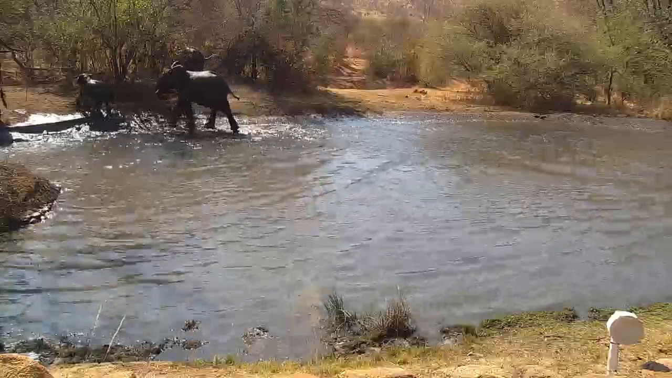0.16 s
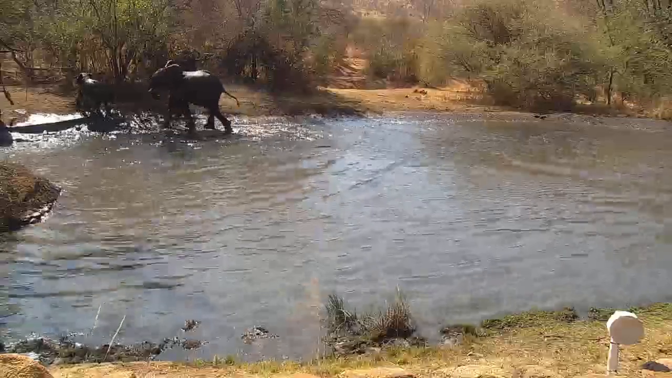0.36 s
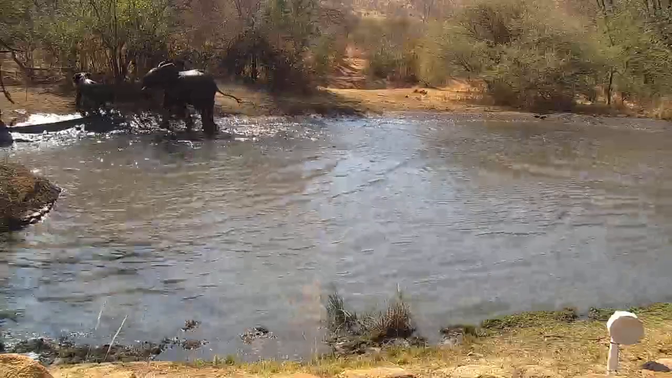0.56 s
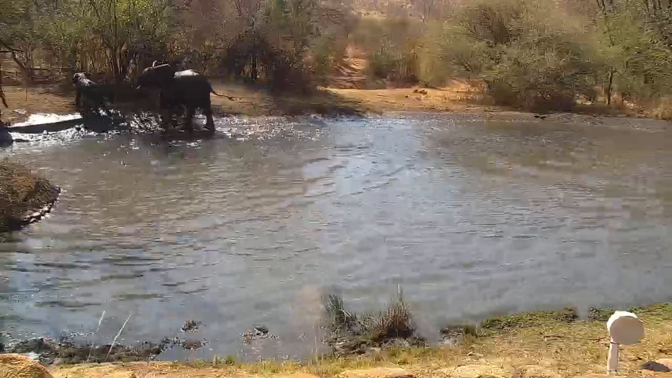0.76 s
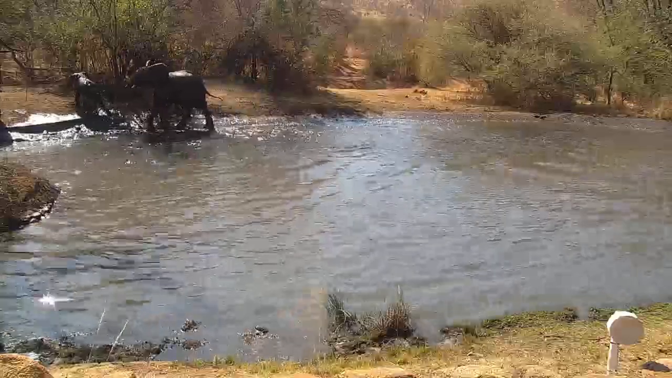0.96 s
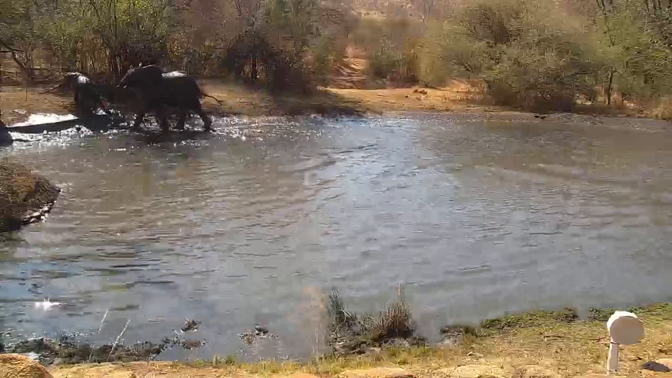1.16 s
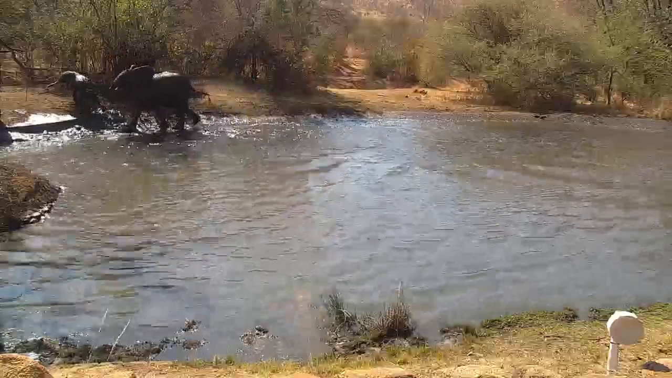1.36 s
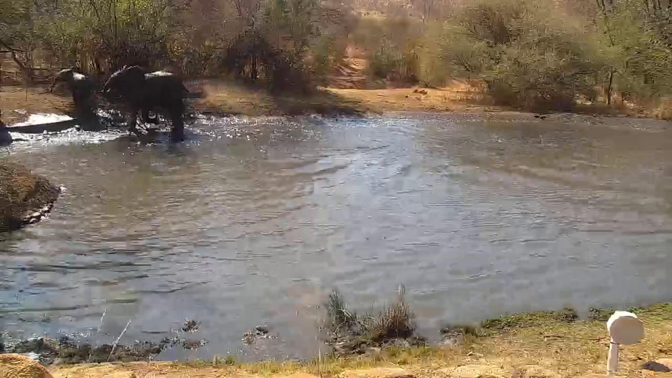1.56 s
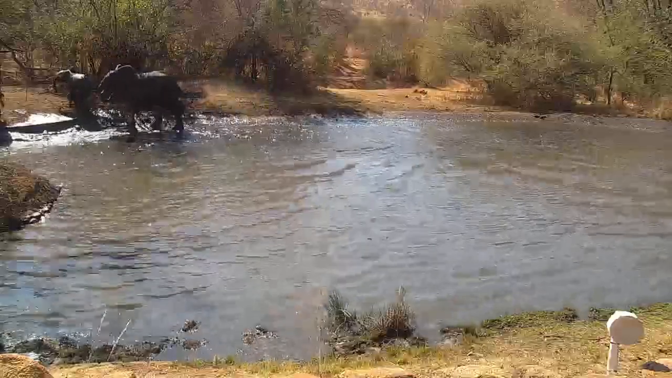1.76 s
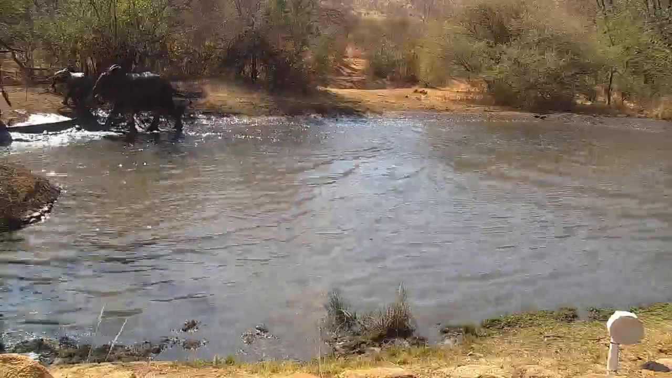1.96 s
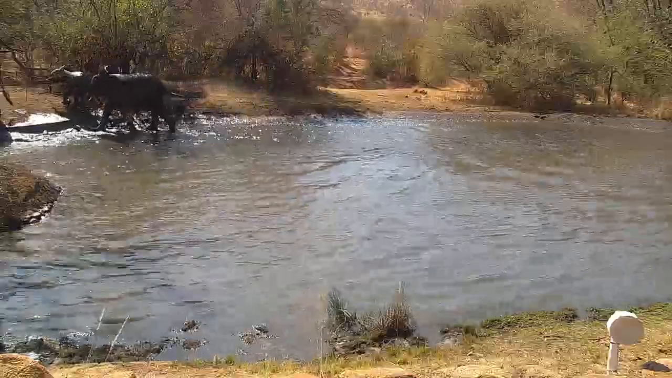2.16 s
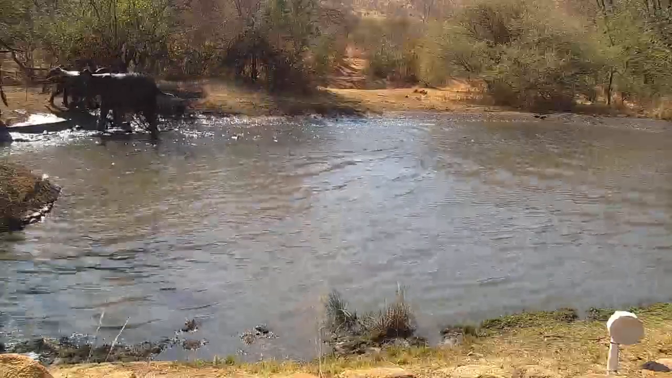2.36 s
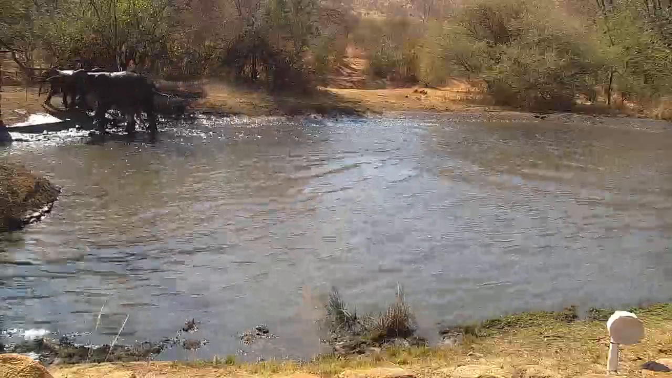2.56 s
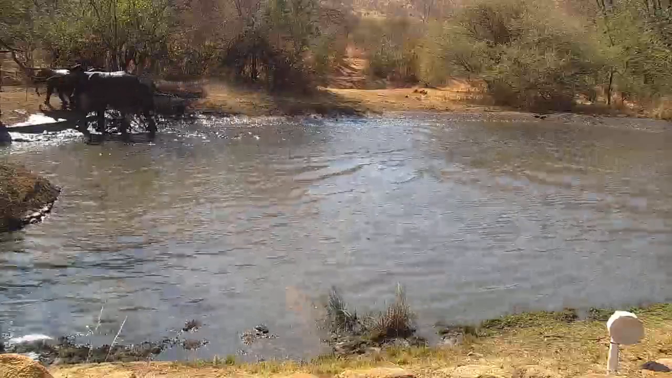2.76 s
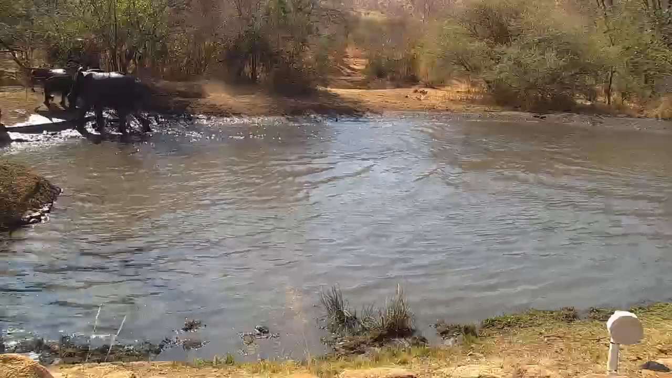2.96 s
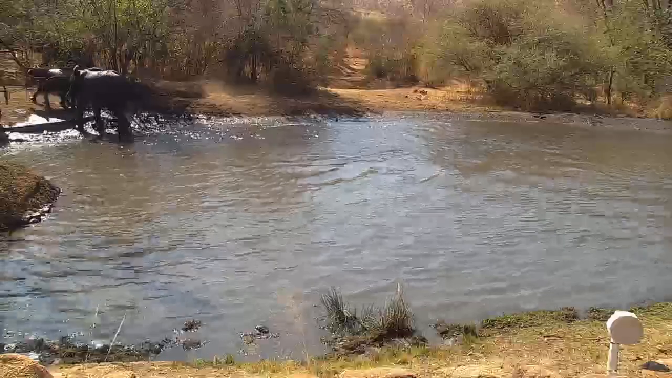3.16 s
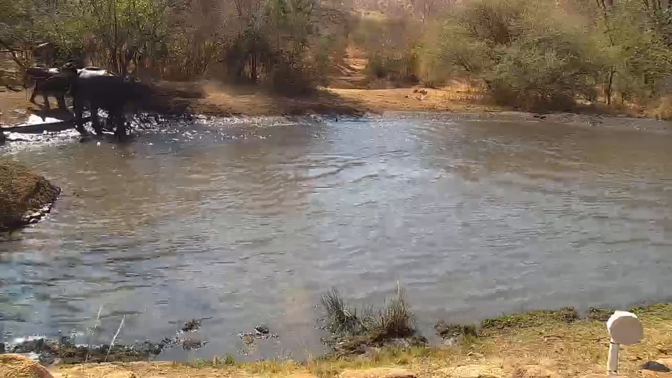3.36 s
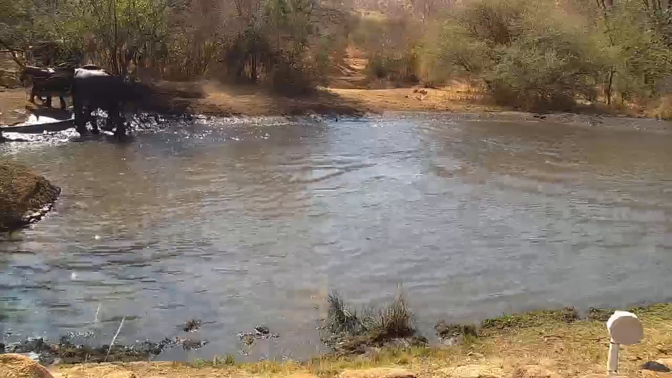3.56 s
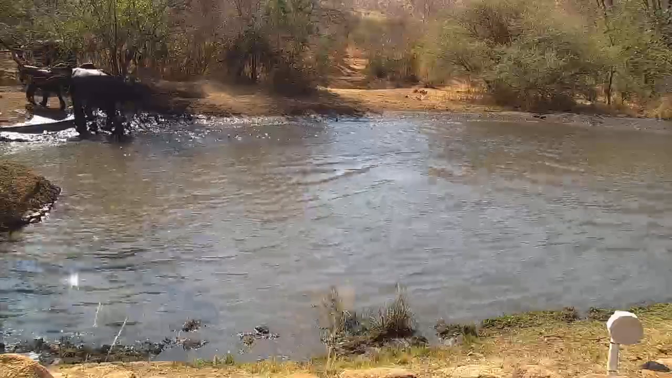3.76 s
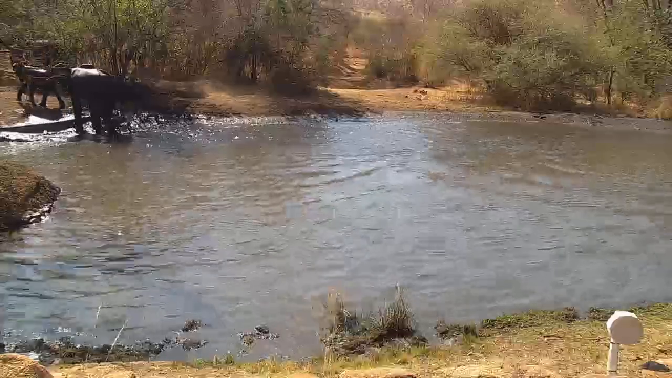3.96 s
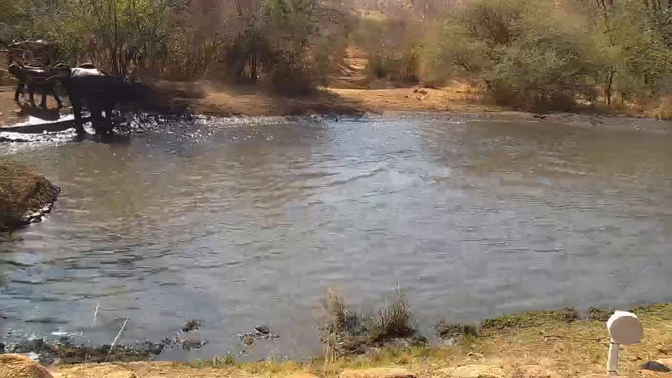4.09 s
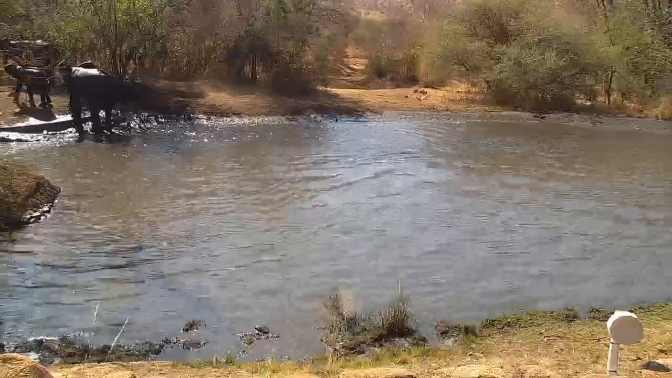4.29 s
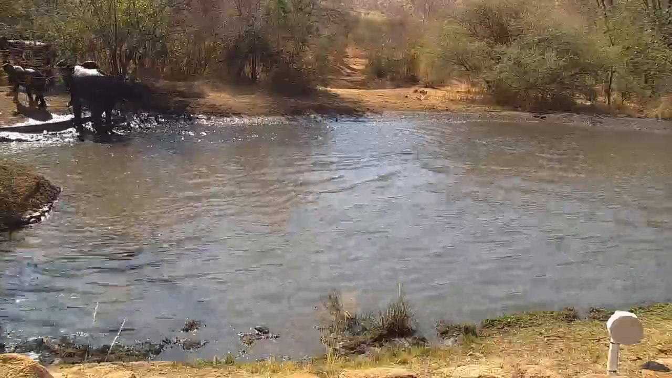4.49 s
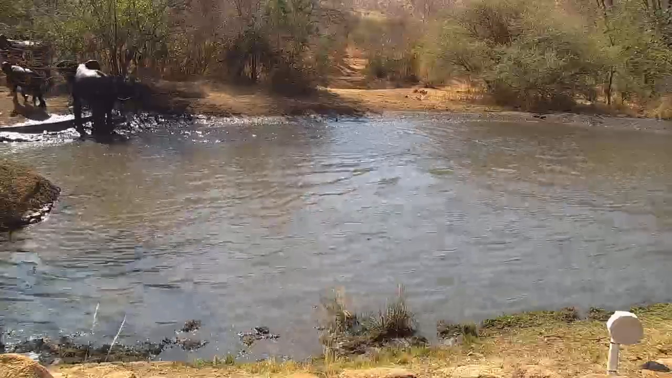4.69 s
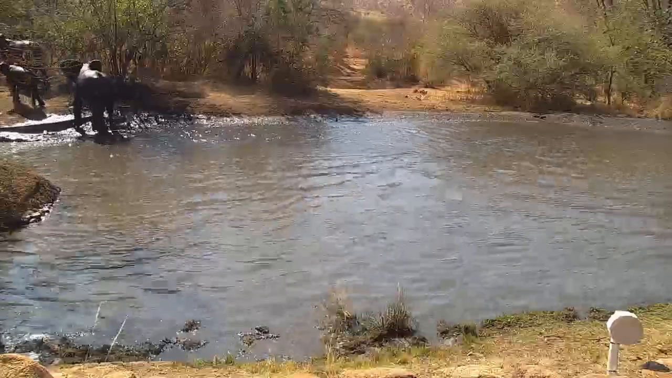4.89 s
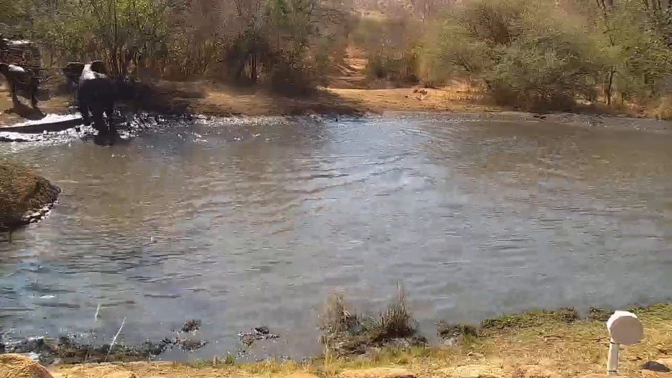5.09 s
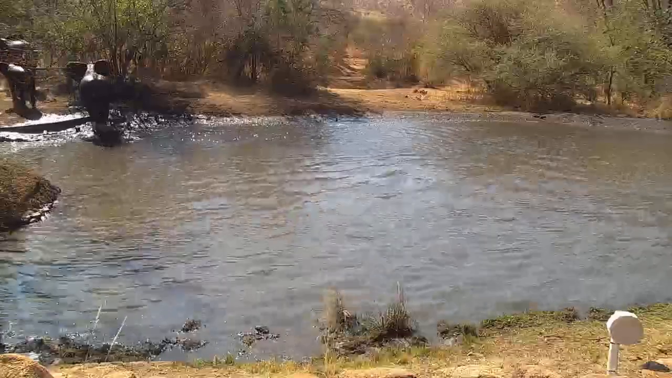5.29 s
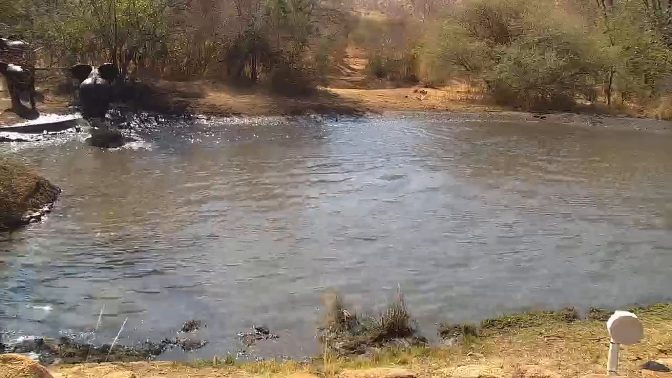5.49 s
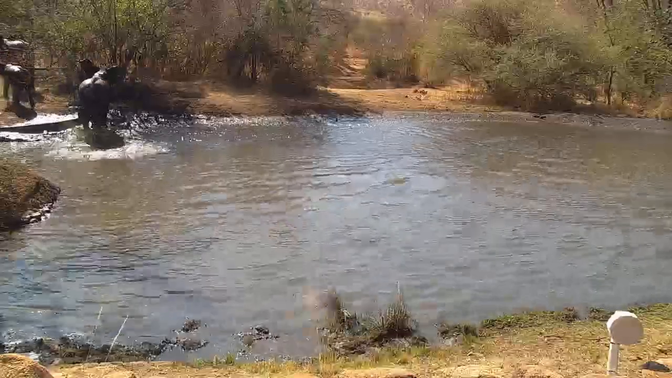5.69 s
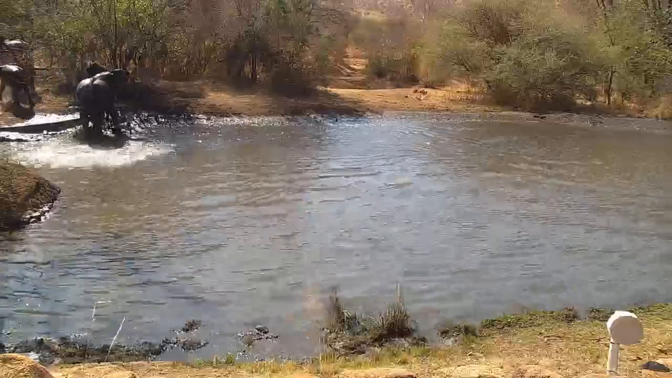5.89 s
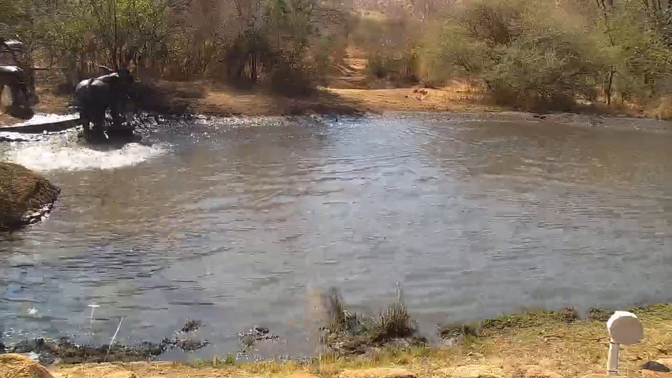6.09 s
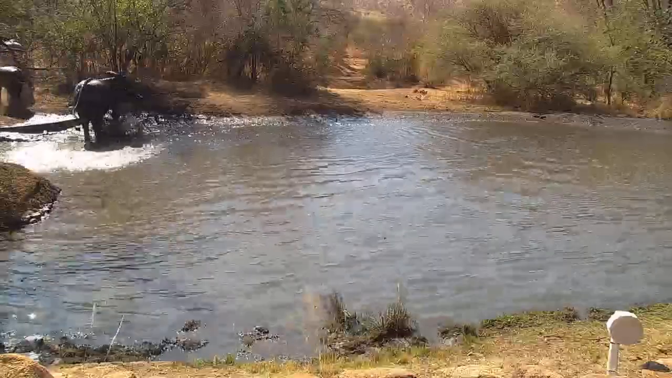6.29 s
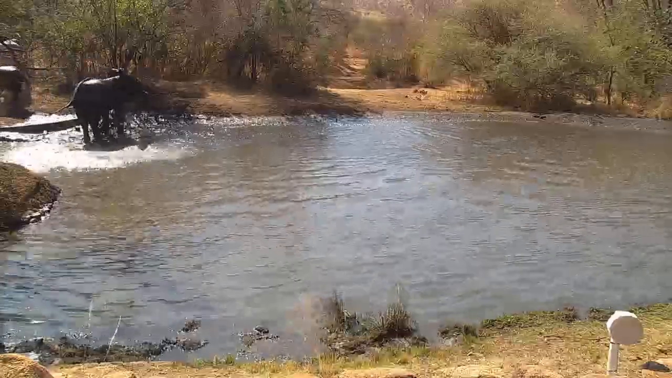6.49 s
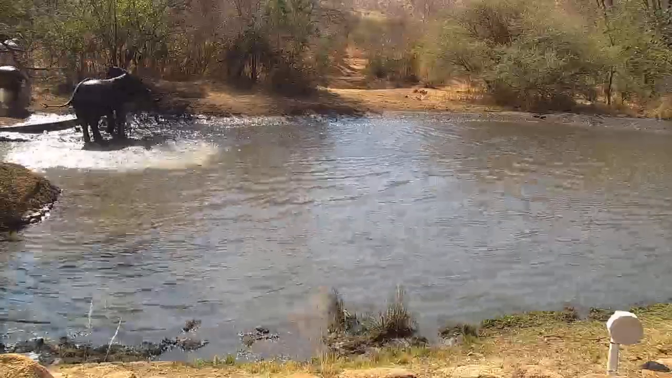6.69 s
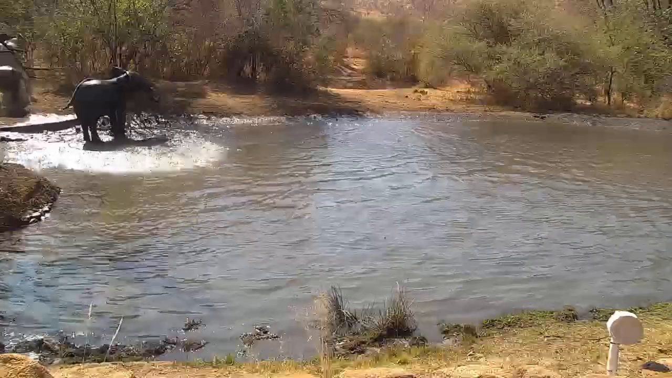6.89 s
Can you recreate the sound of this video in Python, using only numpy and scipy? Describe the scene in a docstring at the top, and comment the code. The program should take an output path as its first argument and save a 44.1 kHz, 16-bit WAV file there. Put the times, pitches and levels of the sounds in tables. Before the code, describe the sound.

Outdoor waterhole with a wind-buffeted microphone inside a resonant enclosure. Irregular wet slaps, trickling droplets and bubbly blips from wading elephants mix with low fluttering gusts and hollow thuds. Strong start, short lull, windy surge near two seconds, gradual calm in the middle, then the hardest slap and sustained splashy churning around six seconds, fading at the end. Steady hiss and faint whine remain underneath.

```python
"""Elephants wade and splash across a waterhole, heard by a microphone inside a hollow housing.
From the start gusts rumble and ring the housing's lowest resonance, filtered noise and droplets make the
churning, and steady hiss and a thin mains whine lie beneath. Noise-burst slaps, decaying knocks and bubble
tones, most of them gliding, soon join. After the first lull the wind swells before two seconds, with its
hardest knock; it calms until about six seconds, when the hardest slap falls and wind and churning rise."""
import sys
import numpy as np
from scipy import signal
from scipy.fft import rfft, irfft, next_fast_len
from scipy.io import wavfile
from scipy.ndimage import uniform_filter1d

SR = 44100
rng = np.random.default_rng(int(sys.argv[2]) if len(sys.argv) > 2 else 0)


def bounce(signal):
    """Save signal as a 16-bit WAV file at the path given by the first command-line argument."""
    frames = np.transpose(np.atleast_2d(signal))
    limited = np.clip(frames, -1, 1)
    pcm = np.round(limited * 32767).astype(np.int16)
    wavfile.write(sys.argv[1], SR, pcm)


N = 306936
T = np.arange(N) / SR  # time of each sample, s
SIZE = next_fast_len(N + SR // 2)  # room for filter tails
F = np.maximum(np.arange(SIZE // 2 + 1) * SR / SIZE, 1)  # frequency of each bin, Hz


def undb(db):
    """Decibels to gain."""
    return 10 ** (np.asarray(db) / 20)


def shape(points):
    """Gain at every frequency from (frequency [Hz], level [dB]) points."""
    hz, db = np.transpose(points)
    return undb(np.interp(np.log(F), np.log(hz), db))


def causal(gain):
    """Minimum-phase response with this gain, so that resonances ring after a blow."""
    cepstrum = irfft(np.log(gain), SIZE)
    cepstrum[1:SIZE // 2] *= 2
    cepstrum[SIZE // 2 + 1:] = 0
    return np.exp(rfft(cepstrum))


def through(x, response):
    """Filter by a frequency response."""
    return irfft(rfft(x, SIZE) * response, SIZE)[:N]


def band(lo_hz, hi_hz):
    """Smooth band-pass gain."""
    return 1 / np.sqrt((1 + (lo_hz / F) ** 8) * (1 + (F / hi_hz) ** 8))


def noise():
    """White noise for the whole scene."""
    return rng.standard_normal(N)


def walk(rate):
    """Random levels held 1 / rate s and slewed twice."""
    k = int(SR / rate)
    steps = np.repeat(rng.standard_normal(N // k + 1), k)
    return 0.92 * uniform_filter1d(uniform_filter1d(steps, k), k)[:N]


def curve(points):
    """Each column of (time [s], level [dB], ..) points at every sample."""
    s, *columns = np.transpose(points)
    return [np.interp(T, s, db) for db in columns]


def bump(at, db, fall_s, rise=1.0):
    """Level in dB of a swell, 10 dB down fall_s after its height and rise * fall_s before."""
    return db - 10 * ((T - at) / np.where(T < at, rise * fall_s, fall_s)) ** 2


def together(*levels_db):
    """Level in dB of unrelated sounds heard at once."""
    return 10 * np.log10(sum(undb(db) ** 2 for db in levels_db) + 1e-18)


def played(source, response, db, lo_hz, hi_hz):
    """The source follows the level curve, as heard in the band lo-hi after the response."""
    unit = np.std(through(source, response * band(lo_hz, hi_hz)))
    return through(source * undb(db) / unit, response)


def add(out, s, sound):
    """Mix a short sound in at time s."""
    i = int(s * SR)
    out[i:i + len(sound)] += sound[:N - i]


def decay(t, t60_s):
    """Exponential fade that falls 60 dB in t60_s."""
    return np.exp(-np.log(1000) * t / t60_s)


def housing():
    """Response of the hollow housing: resonant peaks over a broad leak between them."""
    # housing resonances: (frequency [Hz], width about 4 dB down [Hz], relative level [dB])
    resonances = [(367.3, 34.2, 2.5), (448.3, 50, -11), (678, 91, -24.5), (875, 122, -24),
                  (1337, 136, -20.5), (1891, 62, -19), (2001.6, 78.6, -12.5), (2722, 62, -14.5),
                  (2923, 111, -12), (3140, 310, -23), (3497, 75, -12.5), (3735, 370, -24.5),
                  (4040, 38, -28), (4129, 79, -17.5), (4463, 68, -24), (4790, 63, -28), (5095, 108, -23),
                  (5450, 60, -33), (6030, 60, -41), (6400, 300, -53.5), (6800, 430, -45.5), (7750, 50, -38),
                  (8340, 120, -40), (8980, 48, -44), (9900, 30, -39.5), (10940, 120, -49.5)]
    # what leaks in between the resonances: (frequency [Hz], relative level [dB])
    leak = [(30, -47), (300, -31.5), (1100, -34), (2400, -46), (5000, -43.5), (7500, -46.5), (11000, -53.5)]
    skirt = 1.34  # steepness of the resonance flanks
    power = sum(undb(db) ** 2 / (1 + (2 * (F - hz) / width) ** 2) ** skirt
                for hz, width, db in resonances)
    return causal(np.sqrt(power + shape(leak) ** 2))


def wind(cavity):
    """Turbulence rumbles on the capsule and keeps the lowest resonance ringing."""
    # strength of the wind: (time [s], rumble on the capsule [dB], ringing of the cavity [dB])
    strength = [(0.0, -34, -35), (0.48, -54, -42), (1.1, -50.5, -44), (1.39, -45.5, -38),
                (1.57, -37, -30.5), (1.68, -32.5, -30), (1.94, -34.5, -31), (2.09, -43, -34),
                (2.29, -44.5, -42), (2.77, -39, -33.5), (3.37, -43, -39.5), (3.68, -50.5, -41),
                (3.99, -53.5, -41), (4.57, -45, -42), (4.82, -49.5, -36.5), (5.12, -56, -42),
                (5.93, -46.5, -36), (6.2, -39, -29), (6.61, -48, -37), (6.96, -49.5, -40.5)]
    # sudden puffs on top of the wind: (time of the height [s], rumble level [dB])
    puff_heights = [(.119, -31.5), (0.269, -33), (.345, -40), (.481, -42), (.786, -44.5), (.96, -43),
                    (1.153, -34.5), (1.417, -30), (1.515, -26.5), (1.602, -24.5), (1.74, -35),
                    (1.836, -24.5), (1.9, -32), (2.076, -32.5), (2.48, -38.5), (2.644, -32.5),
                    (2.86, -31.5), (3.046, -36.5), (3.115, -37.5), (3.255, -35.5), (3.464, -33.5),
                    (4.114, -48), (4.38, -48), (4.496, -36), (4.596, -41), (4.705, -34.5), (5.308, -48),
                    (5.46, -49.5), (5.598, -41), (6.015, -30.5), (6.103, -29.5), (6.292, -31), (6.628, -38),
                    (6.806, -46), (6.92, -45)]
    # colour of the rumble: (frequency [Hz], relative level [dB per Hz])
    rumble_colour = [(15, -22.5), (30, -16), (60, -6.5), (120, -1.5), (200, 2), (300, 2.5), (450, -10.5),
                     (560, -14.5), (800, -63.5)]
    puff_s = 0.028  # from a puff's height to 10 dB down, either side
    ring_puff_db = -2.5  # ringing of the cavity relative to a puff
    wind_db, ring_db = curve(strength)
    puff_db = together(*(bump(at, db, puff_s) for at, db in puff_heights))
    rumble_db = together(wind_db, puff_db)
    ring_db = together(ring_db, puff_db + ring_puff_db)
    gusty = noise() * undb(2.96 * walk(25.01) + 0.7 * walk(11))
    fluttering = noise() * undb(1.32 * walk(30) + 1.35 * walk(9))
    rumble = played(gusty, shape(rumble_colour), rumble_db, 50, 260)
    ring = played(fluttering, cavity * band(250, 700), ring_db, 290, 500)
    return rumble + ring


def droplets(rate, cycles, lo_hz, hi_hz, spread_db, most_db):
    """Small bubbles, rate per s: random pitch and size, each a few cycles gliding upward."""
    out = np.zeros(N)
    for at, pitch, size in rng.random((int(rate * N / SR), 3)):
        hz = lo_hz * (hi_hz / lo_hz) ** pitch
        turn = T[:int(3 * cycles * SR / hz)] * hz  # cycles elapsed
        ring = np.exp(-2 * turn / cycles) * np.sin(2 * np.pi * turn * (1 + 0.041 * turn / cycles))
        size_db = min(-spread_db * np.log(1 - size), most_db)
        add(out, at * N / SR, undb(size_db) * ring)
    return out / np.std(out)


def water(cavity):
    """Distant churning: hiss with dense droplets in it, finer spray above, sloshing below."""
    # how hard the herd churns the water:
    # (time [s], churning [dB], fine spray relative to it [dB], deep sloshing relative to it [dB])
    churning = [(0.0, -43.5, -24, 2.5), (0.23, -53, -21.5, -11), (0.43, -51, -23, -8),
                (0.62, -46.5, -26, -2), (0.87, -49.5, -21.5, -1.5), (1.16, -39.5, -25, -8),
                (1.36, -49.5, -24, -8), (1.57, -48.5, -22.5, -5.5), (1.76, -45, -23.5, -7.5),
                (2.04, -52, -22.5, -4), (2.38, -48, -23.5, 1), (3.39, -52.5, -21.5, -9),
                (3.53, -49, -20.5, -1), (4.69, -55.5, -21.5, -2.5), (5.72, -41.5, -22.5, -6),
                (5.8, -39, -23, -3.5), (6.14, -36, -24, -3), (6.67, -37.5, -22, -2.5),
                (6.86, -39, -19.5, -5.5), (6.96, -46.5, -22, 1)]
    # heaves of thrown water that swell and fall back:
    # (time of the height [s], level [dB], spray relative to it [dB], fall time to 10 dB down [s])
    heaves = [(.12, -48, -25, 0.045), (.47, -45, -29, .06), (.79, -51, -19, 0.033),
              (1.04, -43.5, -24, 0.068), (1.15, -40.5, -29, 0.086), (1.7, -45.5, -20.5, 0.11),
              (1.85, -48, -22, 0.087), (2.109, -44.5, -34, .03), (2.5, -47.5, -23, 0.045),
              (2.79, -44, -39, 0.035), (3.105, -42, -25, 0.055), (3.42, -43, -21, 0.034),
              (4.09, -59, -36, 0.027), (4.32, -50, -25, 0.045), (4.505, -46, -19, 0.023),
              (4.81, -48, -28, 0.05), (5.101, -43, -22, 0.022), (5.18, -41.5, -26, .02),
              (5.34, -45, -15, 0.061), (5.418, -40.5, -15, 0.054), (5.54, -59, -11, 0.05),
              (5.64, -41, -31, 0.068), (6.01, -35.5, -22, 0.035), (6.28, -41, -25, .05),
              (6.4, -38, -35, 0.054), (6.55, -44, -27, .05)]
    # borders between regions of the churning that flicker on their own [Hz]
    edges_hz = [1530, 2280, 3250, 3850, 5400]
    rise = 0.71  # a heave rises in this share of the time it takes to fall
    lapping_db, heave_slosh_db = -51, -7  # steady lapping; sloshing in a heave relative to it

    steady_db, fine_db, deep_db = curve(churning)
    heave_db = together(*(bump(at, db, fall, rise) for at, db, _, fall in heaves))
    heave_spray_db = together(*(bump(at, db + fine, fall, rise) for at, db, fine, fall in heaves))
    churn_db = together(steady_db, heave_db)
    spray_db = together(steady_db + fine_db, heave_spray_db)
    slosh_db = together(lapping_db, steady_db + deep_db, heave_db + heave_slosh_db)

    surge = walk(16)  # shared unrest of all three layers
    churn = noise() + 0.87 * droplets(900, 3.7, 1566, 5560, 3.0, 8.9)
    churn = churn * undb(0.57 * surge + 1.08 * walk(60))
    # drops of different sizes come in their own flurries
    churn = sum(through(churn, band(lo, hi)) * undb(1.2 * walk(35))
                for lo, hi in zip(edges_hz, edges_hz[1:]))
    spray = noise() + 0.48 * droplets(1200, 8.9, 4990, 10500, 4.6, 12.0)
    spray = spray * undb(0.51 * surge + 0.86 * walk(13))
    slosh = noise() + 0.21 * droplets(250, 5.1, 475.0, 1690, 2.4, 8.9)
    slosh = slosh * undb(0.41 * surge + 3.5 * walk(9))
    return (played(churn, cavity, churn_db, 1100, 6600)
            + played(spray, cavity * band(4170, 14000), spray_db, 7080, 9700)
            + played(slosh, cavity * band(462, 1810), slosh_db, 452, 2500))


def hiss():
    """Steady air and capsule hiss with no housing colour."""
    # colour of the hiss: (frequency [Hz], relative level [dB per Hz])
    hiss_colour = [(15, -2), (40, 12.5), (120, 4.5), (400, -12.5), (1000, 1), (3000, -8), (5200, -6),
                   (6000, -16.5), (8500, -24), (11000, -28)]
    x = through(noise(), shape(hiss_colour))
    return undb(-58) * x / np.std(x)  # dB rms


def whine():
    """Steady mains harmonics from the electronics."""
    # harmonics: (multiple of the mains frequency, level [dB rms])
    harmonics = [(1, -61), (7, -61), (8, -61.5), (9, -58.5), (12, -54), (13, -60), (15, -67.5)]
    mains_hz = 100.05
    return sum(np.sqrt(2) * undb(db) * np.sin(2 * np.pi * (k * mains_hz * T + rng.random()))
               for k, db in harmonics)


def burst_through(burst, response):
    """Filter bursts by a response scaled to unit mean power."""
    return through(burst, response / np.sqrt(np.mean(np.abs(response) ** 2)))


def spray_through(burst, cavity):
    """Fine spray of slaps and flecks through the upper resonances of the housing."""
    return 0.8 * burst_through(burst, cavity * band(4400, 14000))


def slaps(cavity):
    """Each slap is a ragged burst of noise, strongest round its centre, with spray."""
    # water slaps: (time [s], level before mixing and filtering [dB], centre [Hz], spray relative to it [dB])
    slap_list = [(0.0153, -24.5, 1980, -31), (0.1545, -18.5, 1997, -35), (0.4394, -24.5, 3490, -31),
                 (0.4638, -23, 1980, -28), (0.5053, -22.5, 3490, -38), (0.6035, -25, 1980, -27),
                 (0.775, -20, 3470, -34), (1.1238, -21, 2860, -34), (1.6195, -25.5, 1310, -20.5),
                 (2.0752, -22.5, 2000, -30), (2.1001, -16.5, 2034, -49), (2.2662, -25.5, 3080, -24),
                 (2.377, -26.5, 3480, -21), (2.4558, -26.5, 2900, -31), (2.7719, -21.5, 1980, -35),
                 (3.0784, -27, 2930, -27), (3.0958, -21.5, 3560, -30), (3.4116, -24, 2690, -21),
                 (3.6182, -28, 2080, -32), (4.0781, -26.5, 2690, -38), (4.4902, -32, 1950, -20),
                 (4.7953, -27, 1960, -43), (4.9198, -29, 1980, -34), (5.025, -19.5, 3580, -12.5),
                 (5.0893, -23.5, 2030, -35), (5.1637, -18, 1320, -37), (5.3053, -20, 1910, -10.5),
                 (5.4093, -21.5, 3530, -15), (5.6156, -25.5, 2020, -29), (5.8775, -28, 2000, -26),
                 (5.9908, -11.5, 2870, -28), (6.535, -16.5, 2900, -34), (6.7116, -23, 3500, -30)]
    centre_share, body_share = 0.26, 0.18  # mix of the tone round the centre and the wide noise
    body, spray, centre = np.zeros((3, N))
    t = T[:SR // 5]
    for at, db, hz, spray_db in slap_list:
        wide, fine, slow, ragged = rng.standard_normal((4, len(t)))
        # a sharp crack, then the tail of falling water
        fade = (1 - np.exp(-t / 0.00085)) * (decay(t, 0.05) + 0.38 * np.exp(-t / 0.0025))
        # the thrown water lands as a cluster of drops, not one smooth decay
        fade = fade * undb(0.95 * uniform_filter1d(ragged, size=100) * 10)
        wobble = 1 + 0.5 * uniform_filter1d(slow, size=100) * 10
        add(body, at, undb(db) * fade * wide)
        add(spray, at, undb(db + spray_db) * fade * fine)
        add(centre, at, undb(db) * fade * wobble * np.sin(2 * np.pi * hz * t))
    return (centre_share * centre + body_share * burst_through(body, cavity * band(680, 4900))
            + spray_through(spray, cavity))


def buffets():
    """Single eddies knock the cavity: a swell of a few cycles near its pitch, with a low thump."""
    # eddies knocking at the cavity: (time [s], peak of the swell [dB], swell time [s])
    knocks = [(0.045, -18, .0059), (0.086, -23.5, 0.017), (0.119, -20, 0.021), (0.257, -13, 0.0041),
              (0.272, -23, 0.0044), (0.331, -24, 0.0057), (0.589, -26.5, 0.009), (1.055, -32, 0.02),
              (1.425, -22, 0.0093), (1.405, -19, 0.011), (1.51, -13.5, 0.0079), (1.555, -22, 0.0042),
              (1.606, -18.5, 0.0082), (1.659, -15.5, 0.0056), (1.687, -14.5, 0.0026), (1.766, -18, 0.0079),
              (1.817, -7.5, 0.0096), (2.027, -20, 0.0075), (2.072, -17.5, 0.0083), (2.519, -25.5, 0.0081),
              (2.629, -17, 0.0083), (2.78, -22.5, 0.0058), (2.808, -21.5, 0.013), (2.892, -17, 0.0093),
              (3.03, -17.5, 0.0062), (3.451, -24.5, 0.016), (3.305, -27, 0.013), (3.835, -32.5, .018),
              (4.262, -28, 0.016), (4.342, -30, 0.015), (4.45, -23.5, 0.013), (4.501, -24, 0.0082),
              (4.92, -30, 0.028), (5.605, -25, 0.016), (5.833, -35, 0.0044), (6.023, -18.5, 0.004),
              (6.084, -19.5, 0.0067), (6.135, -22, 0.0095), (6.225, -21, 0.0057), (6.264, -25, 0.011),
              (6.299, -22, .0066), (6.328, -23, 0.01), (6.37, -20, .0063), (6.597, -23, .01),
              (6.675, -24, 0.0048)]
    # a knock sits near the cavity pitch, lower the shorter it is
    cavity_hz, sag, scatter = 379.8, 0.17, 0.015  # Hz, Hz s, random spread (share)
    out, t = np.zeros(N), T[:SR // 5]
    for at, db, length in knocks:
        pitch, thump = rng.uniform(-0.98, 1, 2)
        swell = undb(db) * (t / length * np.exp(1 - t / length)) ** 2
        hz = (cavity_hz - sag / length) * (1 + scatter * pitch)
        thump_hz = 165 + 75 * thump  # on the capsule
        add(out, at, swell * (np.sin(2 * np.pi * hz * t) + 0.19 * np.sin(2 * np.pi * thump_hz * t)))
    return out


def gulps_and_knock():
    """Single bubbles and drips ring as decaying sines, most gliding in pitch; the steady 412 Hz one is a knock."""
    # (time [s], level before onset and decay [dB], starting pitch [Hz],
    #  glide, half the change of pitch [share per s])
    tones = [(.197, -32, 3480, 0.5), (1.624, -38, 1340, 1), (3.022, -27, 600, 2), (4.079, -31, 2750, 4.5),
             (4.307, -36, 4100, 1), (4.864, -26, 740, -8), (5.305, -15, 412, 0), (5.835, -28, 1340, -0.5),
             (5.548, -23.5, 547, -0.5)]
    out, t = np.zeros(N), T[:SR // 5]
    for at, db, hz, glide in tones:
        t60_s = 12 / hz + 0.04  # a number of cycles plus a fixed part
        fade = (1 - np.exp(-t / 0.0027)) * decay(t, t60_s)
        add(out, at, undb(db) * fade * np.sin(2 * np.pi * hz * t * (1 + glide * t)))
    return out


def flecks(cavity):
    """Flecks of fine spray: decaying noise through the upper resonances of the housing."""
    # (time [s], level before mixing and filtering [dB])
    fleck_list = [(1.2935, -50), (3.2665, -51), (3.8548, -45.5), (5.1194, -52)]
    out, t = np.zeros(N), T[:SR // 5]
    for at, db in fleck_list:
        add(out, at, undb(db) * decay(t, 0.17) * rng.standard_normal(len(t)))
    return spray_through(out, cavity)


def scene():
    """Wind, water, hiss and whine at one microphone."""
    cavity = housing()
    steady = wind(cavity) + water(cavity) + hiss() + whine()
    events = slaps(cavity) + buffets() + gulps_and_knock() + flecks(cavity)
    return (steady + events)[None]


def record(dry):
    """The recorder cuts the top steeply."""
    top_hz = 11020
    return signal.sosfilt(signal.ellip(10, 0.2, 60, top_hz, fs=SR, output="sos"), dry)


dry = scene()
out = record(dry)
bounce(out)
```